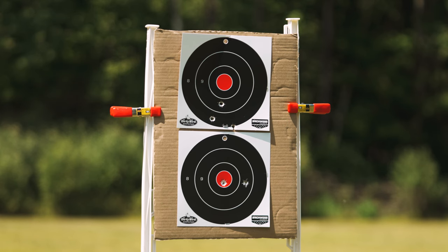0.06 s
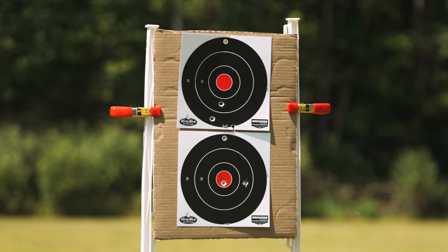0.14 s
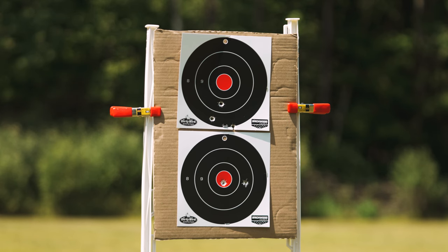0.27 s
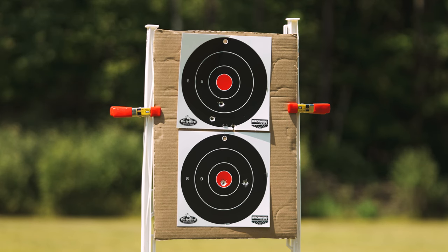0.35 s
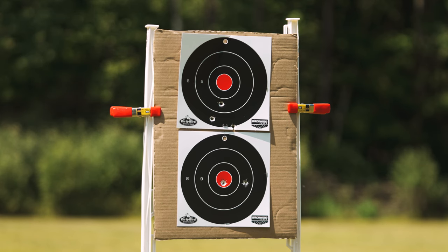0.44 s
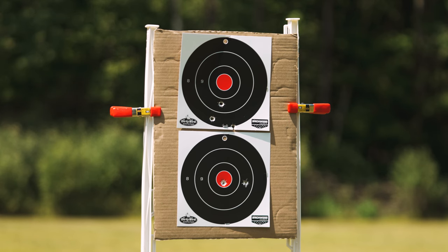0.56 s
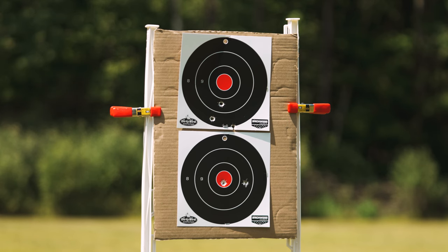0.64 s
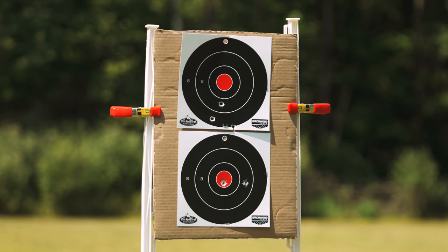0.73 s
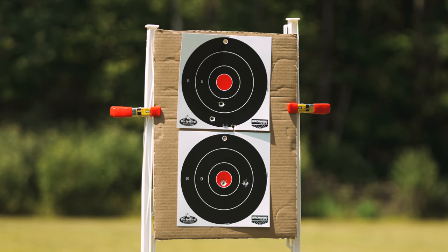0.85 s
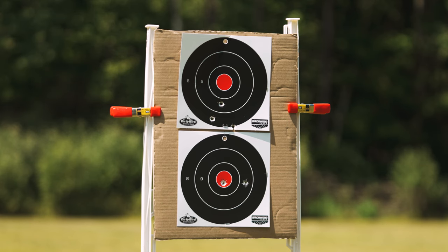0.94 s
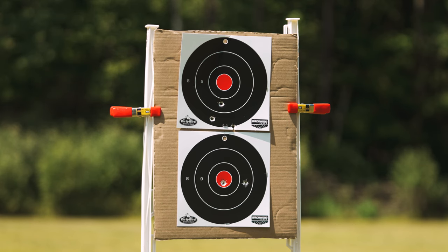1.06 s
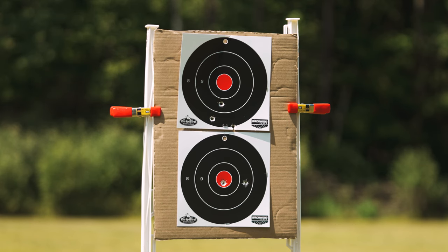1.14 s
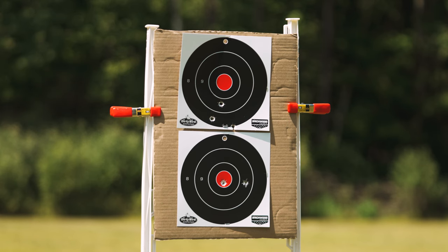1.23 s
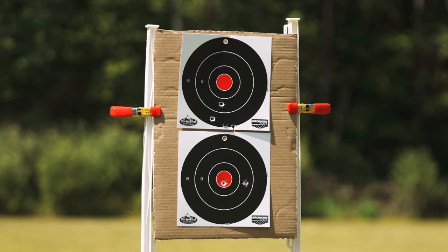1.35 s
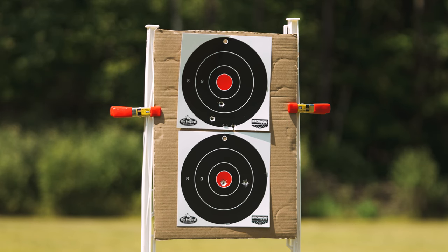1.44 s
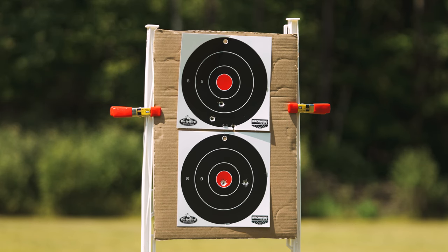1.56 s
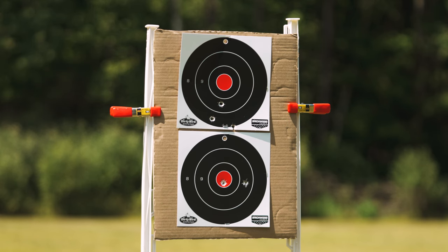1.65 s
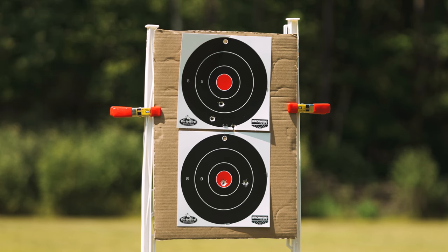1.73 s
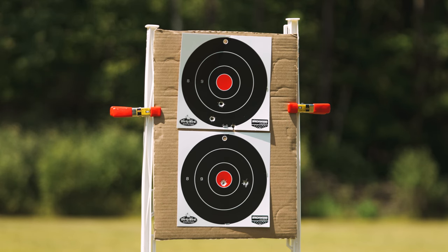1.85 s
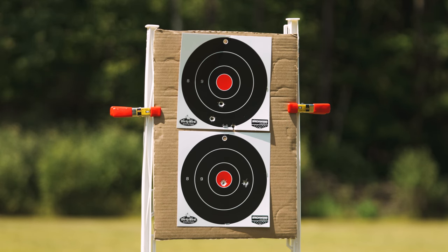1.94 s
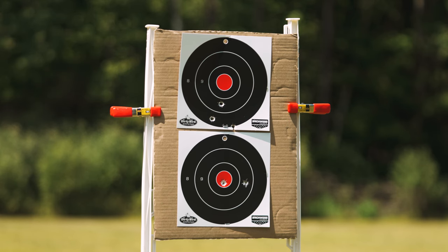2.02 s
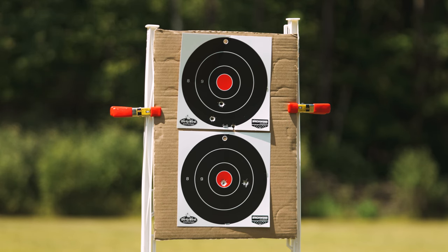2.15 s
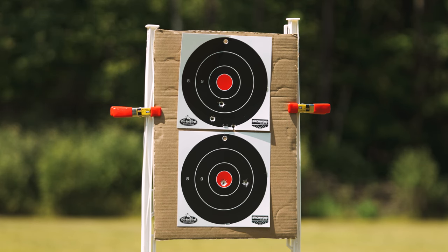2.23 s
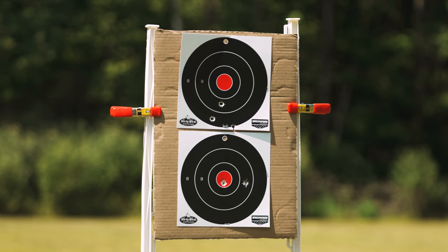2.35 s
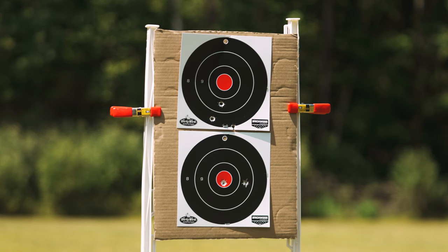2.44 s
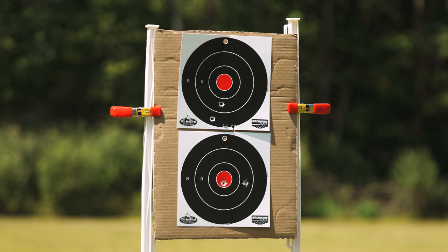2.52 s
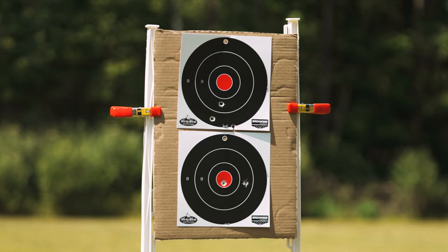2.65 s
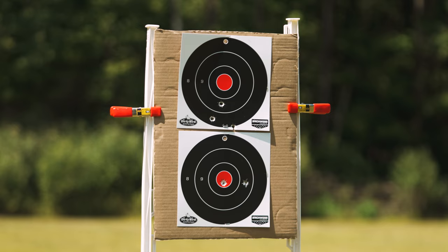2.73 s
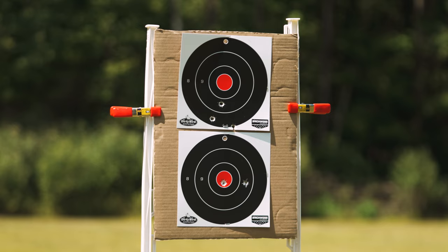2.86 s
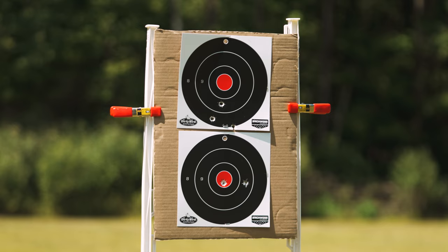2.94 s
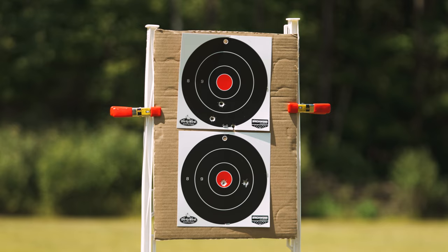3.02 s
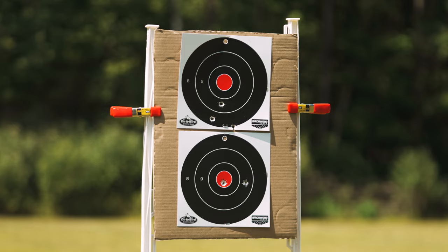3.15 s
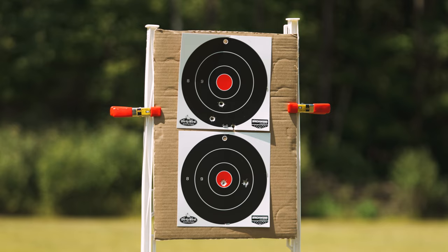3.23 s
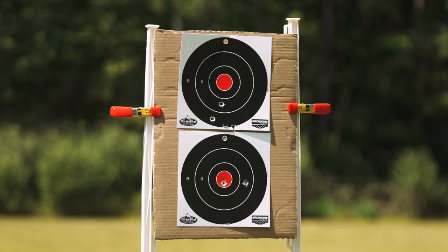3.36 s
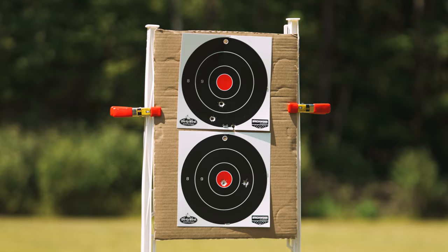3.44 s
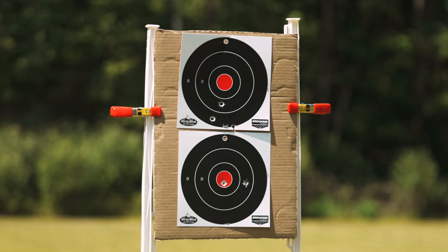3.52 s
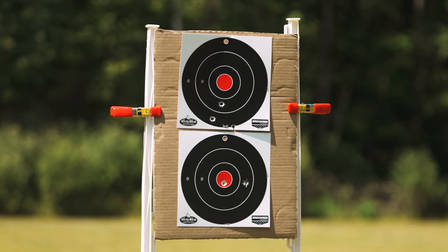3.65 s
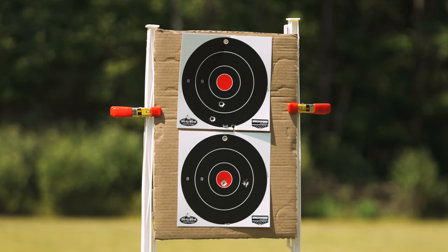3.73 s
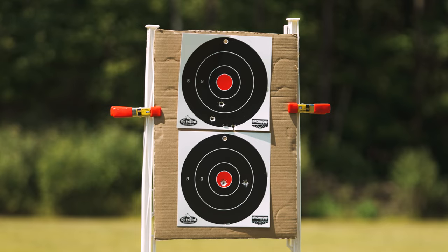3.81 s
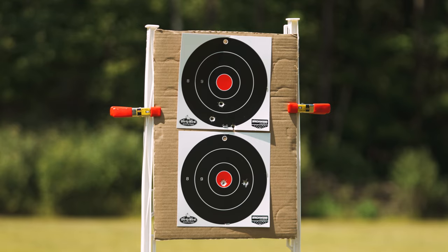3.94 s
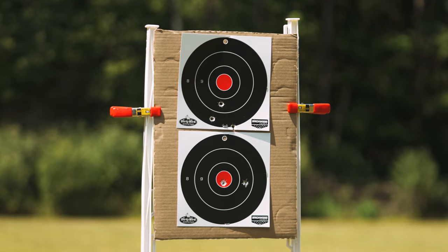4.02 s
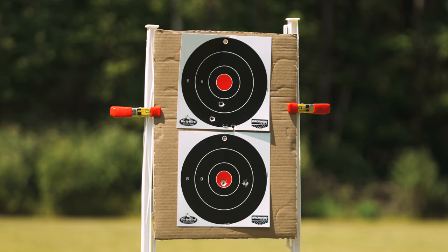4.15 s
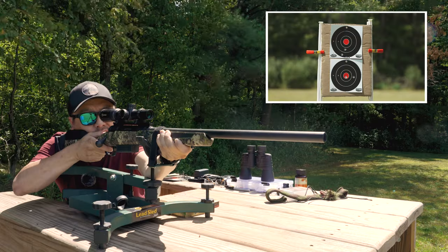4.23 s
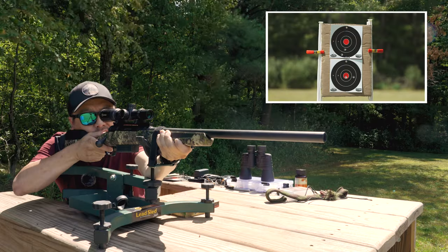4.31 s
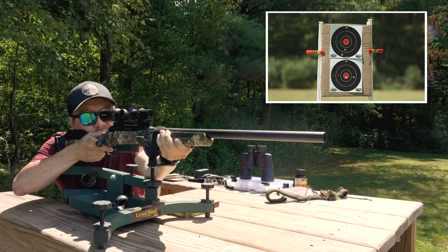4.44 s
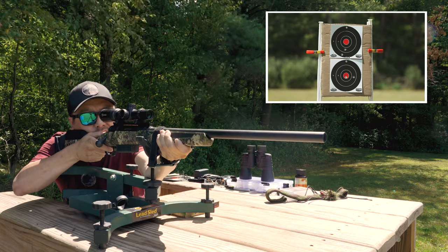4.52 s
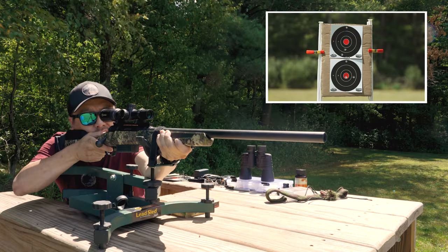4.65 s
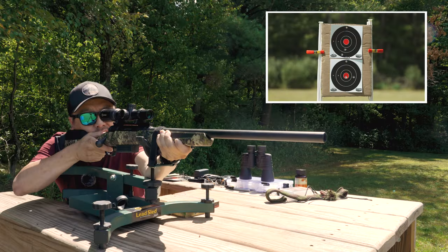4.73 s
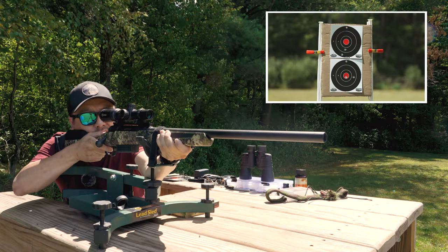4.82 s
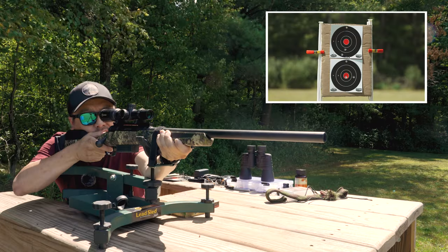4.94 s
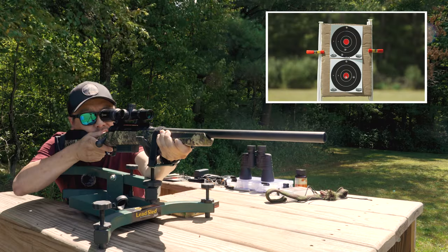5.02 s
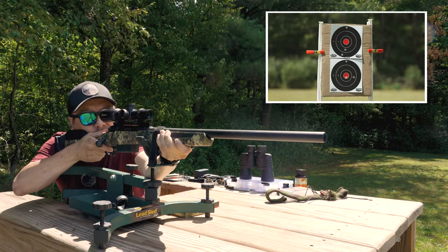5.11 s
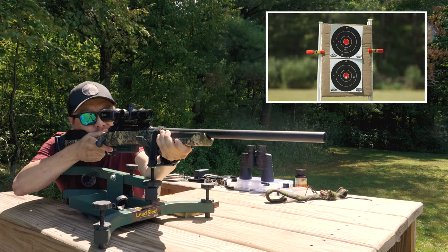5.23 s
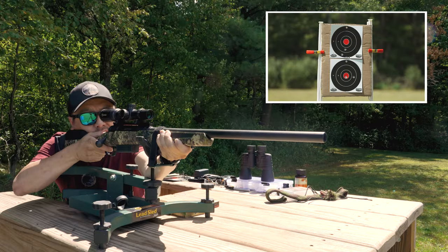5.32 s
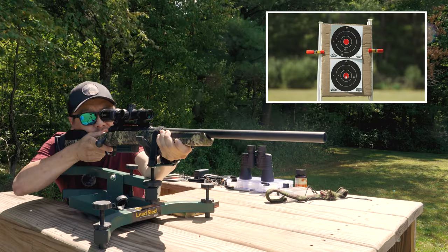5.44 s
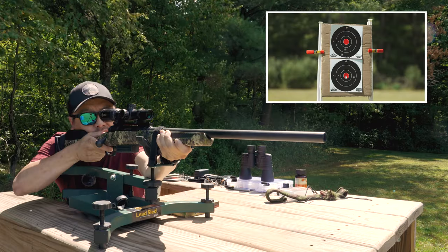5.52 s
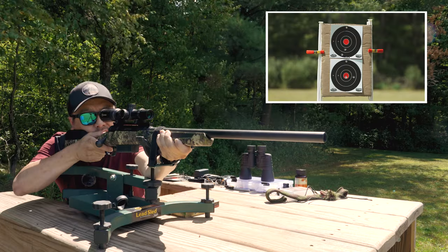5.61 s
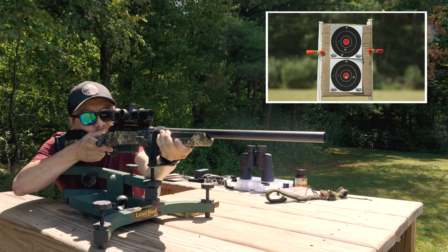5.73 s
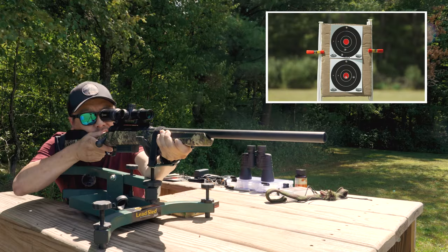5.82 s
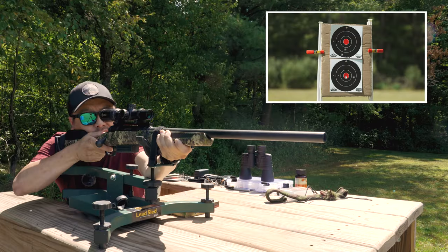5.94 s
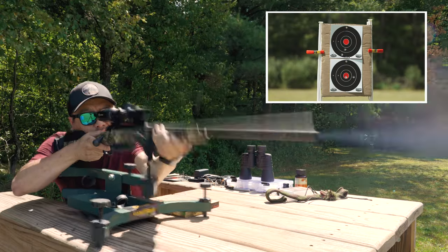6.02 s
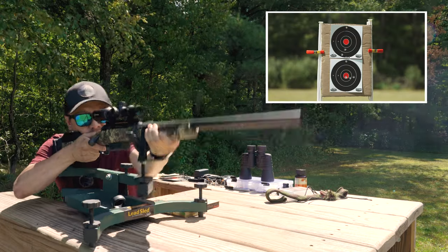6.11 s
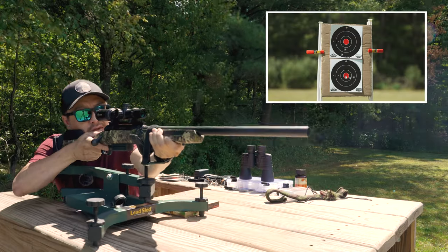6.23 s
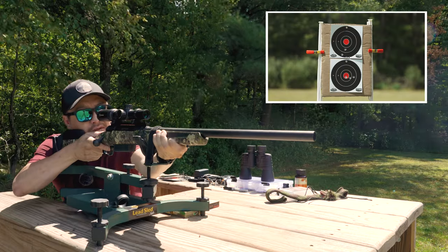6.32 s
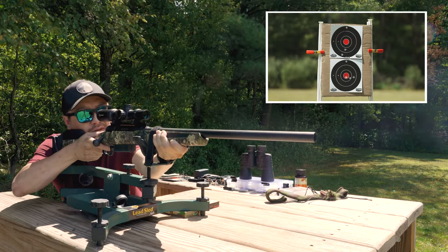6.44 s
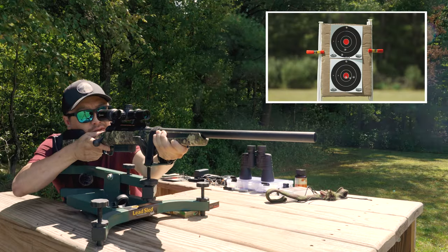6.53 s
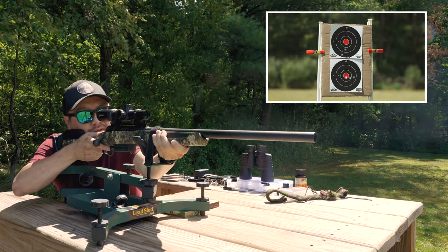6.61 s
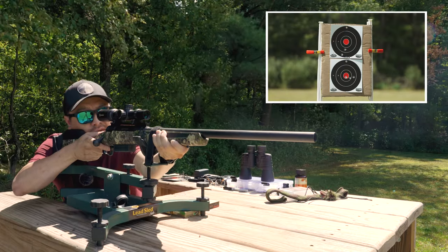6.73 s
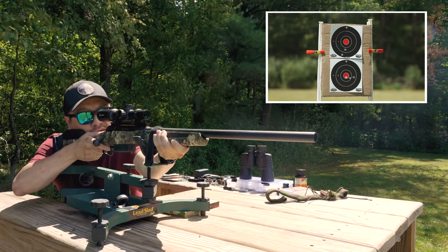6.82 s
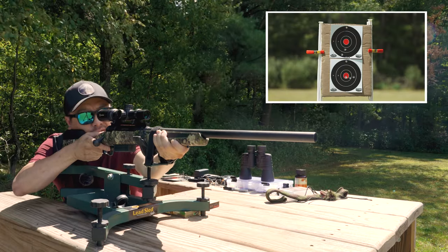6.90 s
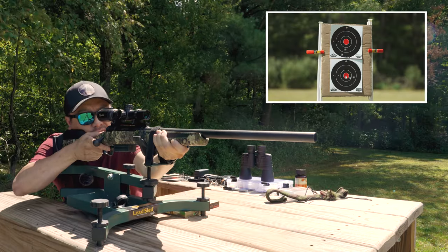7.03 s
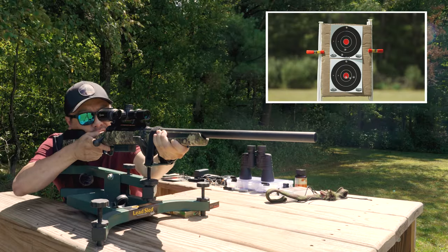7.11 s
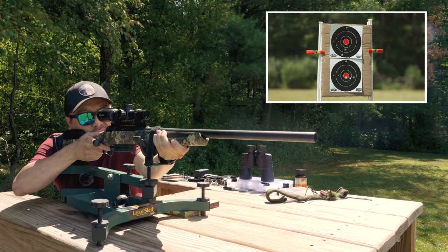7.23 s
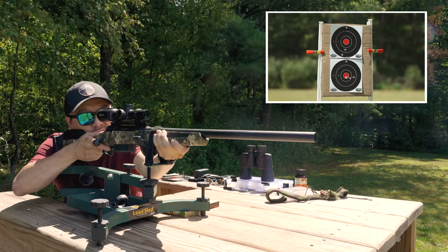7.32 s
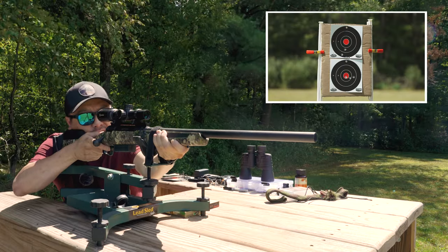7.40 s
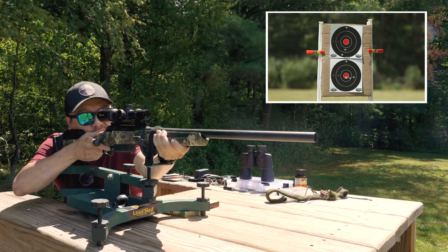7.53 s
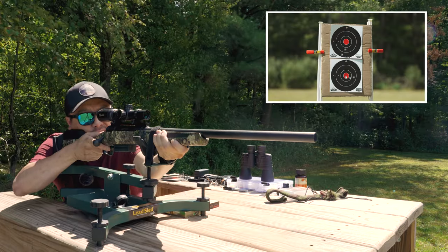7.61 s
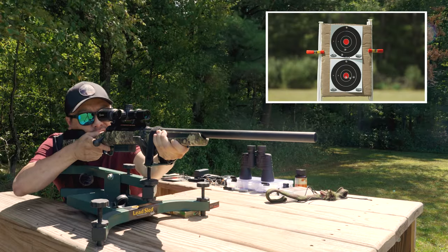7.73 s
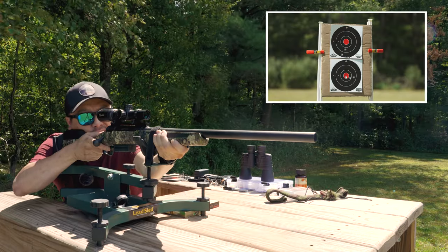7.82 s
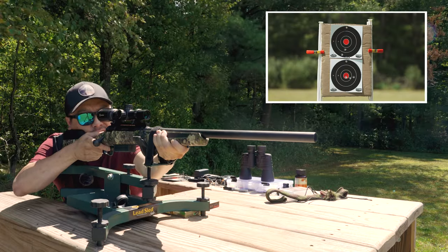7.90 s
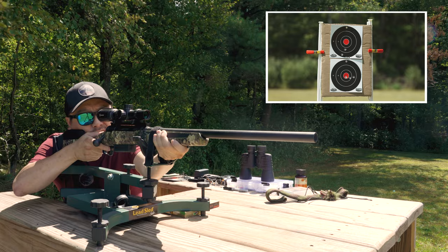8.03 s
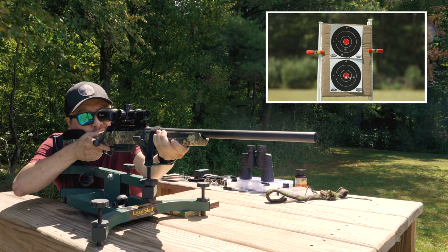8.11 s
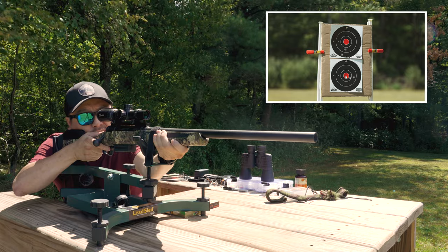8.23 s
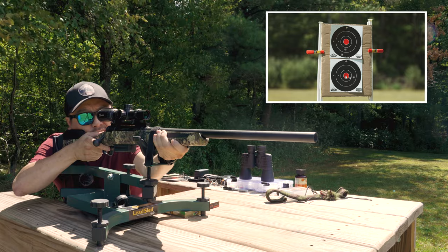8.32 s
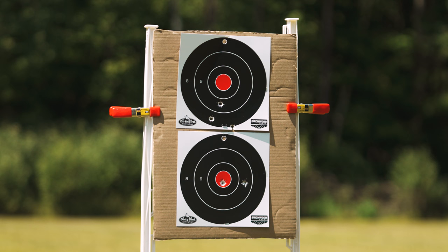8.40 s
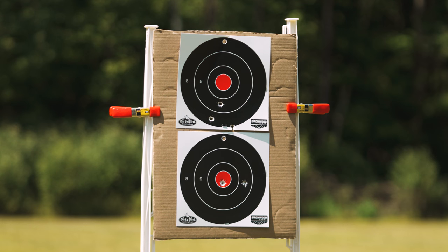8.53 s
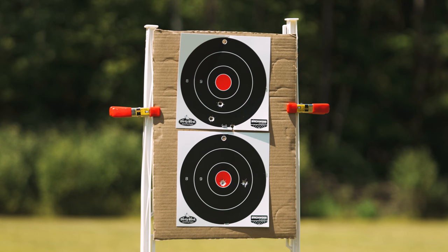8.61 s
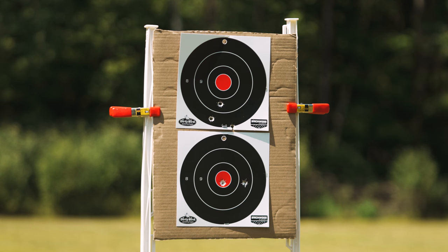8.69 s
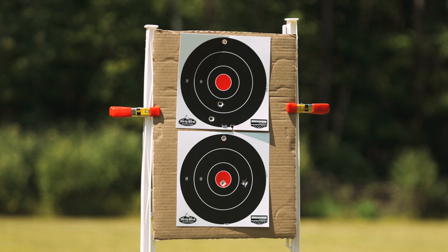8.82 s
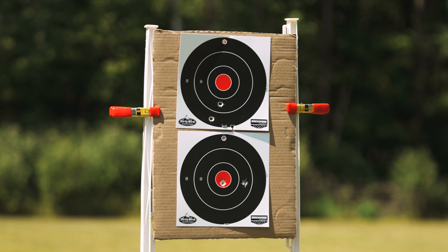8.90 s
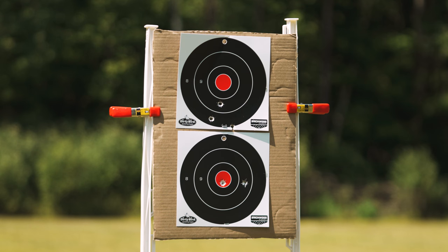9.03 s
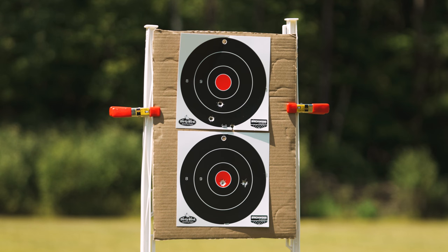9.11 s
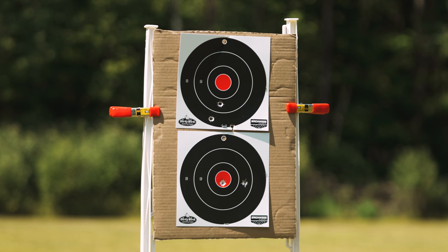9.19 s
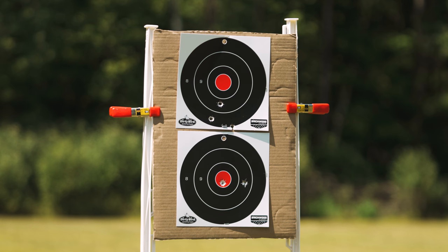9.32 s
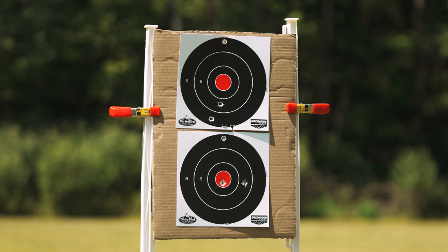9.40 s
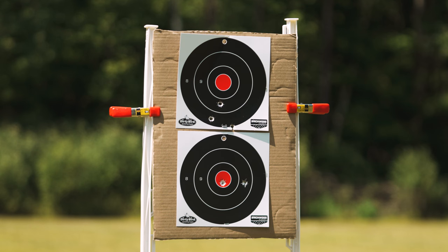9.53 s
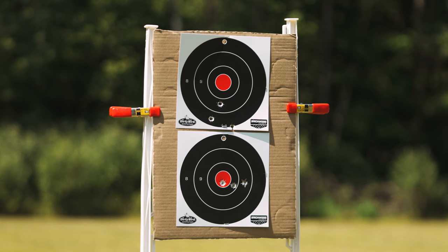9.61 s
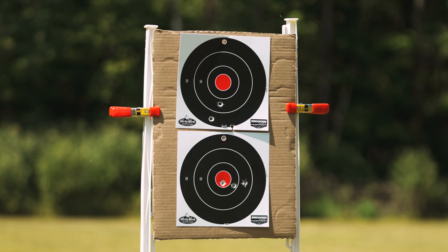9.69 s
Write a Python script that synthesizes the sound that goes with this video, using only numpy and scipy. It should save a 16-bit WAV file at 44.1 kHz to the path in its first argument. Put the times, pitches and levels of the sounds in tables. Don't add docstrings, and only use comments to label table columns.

```python
import sys
import numpy as np
from scipy import signal
from scipy.fft import rfft, irfft
from scipy.io import wavfile
from scipy.ndimage import uniform_filter1d

SR = 44100
rng = np.random.default_rng(int(sys.argv[2]) if len(sys.argv) > 2 else 0)


def store_pcm(level_fs):
    pcm = np.round(np.clip(level_fs, -1, 1) * 32767).astype(np.int16)
    wavfile.write(sys.argv[1], SR, np.atleast_2d(pcm).T)


def linear_from_db(decibels):
    return 10 ** (np.asarray(decibels, float) / 20)


N = 430416
T = np.arange(N) / SR
SHOT_S = 6.12
RAIL, CUT_HZ = 0.46, 171


def curve(rows):
    s, *columns = np.transpose(rows)
    return [np.interp(T, s, c) for c in columns]


def band(x, lo_hz, hi_hz, order=2):
    return signal.sosfilt(signal.butter(order, [lo_hz, min(hi_hz, .45 * SR)], "band", fs=SR, output="sos"), x)


def hiss(lo_hz, hi_hz, size=N):
    x = band(rng.standard_normal(size), lo_hz, hi_hz)
    return x / x.std()


def tinted(peaks):
    white = rng.standard_normal(N)
    x = sum(linear_from_db(db) * band(white, hz - w / 2, hz + w / 2) for hz, w, db in peaks)
    return x / x.std()


def deep(x):
    hz = np.fft.rfftfreq(N, 1 / SR)
    return irfft(rfft(x) * np.sqrt(1 + (CUT_HZ / np.maximum(hz, 40)) ** 6), N)


def ring(x, hz, t60):
    radius = np.exp(-np.log(1000) / (t60 * SR))
    w = 2 * np.pi * hz / SR
    return signal.lfilter([0, np.sin(w)], [1, -2 * radius * np.cos(w), radius * radius], x)


def walk(rate, size=N):
    k = int(SR / rate)
    return 0.71 * uniform_filter1d(np.repeat(rng.standard_normal(size // k + 1), k), k)[:size]


def add(out, s, x):
    i = int(s * SR)
    out[i:i + len(x)] += x[:N - i]


def fade(t60, rise=0.00074, bend=1.25):
    t = T[:int(.15 * SR)]
    return (1 - np.exp(-t / rise)) * np.exp(-np.log(1000) * (t / max(t60, .002)) ** bend)


def field():
    # f/Hz, density level/dB per Hz
    spectrum = [(15, -44), (25, -19), (53, -9), (82, -7), (185, -7), (285, -8), (545, -5), (607, -7.5),
                (775, -9), (1440, -13.5), (2220, -17.5), (2410, -18), (7310, -19), (8590, -20),
                (16000, -30)]
    # t/s, level/dB
    swell = [
        (0, 3),
        (1.5, 3.5),
        (6.1, 1),
        (6.2, 9.5),
        (8.5, 6),
        (9.76, 5),
    ]
    field_db = -59.5
    hz = np.fft.rfftfreq(N, 1 / SR) + 1
    spectrum_hz, spectrum_db = np.transpose(spectrum)
    db = np.interp(np.log(hz), np.log(spectrum_hz), spectrum_db)
    x = irfft(rfft(rng.standard_normal(N)) * linear_from_db(db), N)
    return deep(x / x.std()) * linear_from_db(field_db + curve(swell)[0] + 0.89 * walk(3.52))


def shell():
    # t/s, peak level/dB, mouth ring over it/dB, rim tick over it/dB
    bounces = [(0.0004, -4.5, -28, -14), (0.0143, -15, -14, -12), (0.2914, -11, -6.5, -22),
               (0.343, -34, -6, -14), (0.4463, -14, -10, -7), (0.523, -20.5, -7.5, -12),
               (0.5656, -32, -1, -4), (0.633, -40, -3, -11.5), (0.654, -31.5, -11, -2),
               (0.7724, -50, 4, -17), (0.8585, -36.5, -9, 5.5), (0.868, -52, -3, 6), (0.882, -52, -1, 4),
               (0.8994, -50, 1, -9), (0.9228, -51, -10, 0), (0.972, -41.5, -0.5, 1), (0.977, -50, -5, 7),
               (0.987, -43.5, -20, -2), (1.0413, -45.5, 3.5, 4), (1.0877, -46, -8, 2),
               (1.0995, -42, -15, -15), (1.124, -54, -8, 5), (0.0535, -34, -14, -12)]
    # f/Hz, level/dB, T60/s
    hull_modes = [(376, -5.5, 0.11), (1720, -8, 0.0064), (4200, -19, 0.013), (3590, -16, 0.047),
                  (5190, -6, 0.0084), (7480, -9.5, 0.0065), (8350, -9, 0.0052)]
    # f/Hz, T60/s
    mouth_mode = (1340, .055)
    # f/Hz, T60/s
    rim_mode = (5550, .012)
    # f/Hz, level/dB, T60/s
    rim_overtones = [(6100, -5.5, 0.0095), (6850, -10, 0.007), (8900, -21, .01)]
    # f/Hz, T60/s
    wall_mode = (3480, .12)
    wall_level_db, wall_with_mouth, wall_fade_db_per_s = -10, 1, -3
    shiver_db, shiver_s = -30.5, 0.13
    crack, mouth, rim, wall = np.zeros((4, N))
    for s, db, mouth_db, rim_db in bounces:
        add(crack, s, linear_from_db(db) * (fade(0.0097) + linear_from_db(shiver_db) * fade(shiver_s, bend=1.0)))
        add(mouth, s, linear_from_db(db + mouth_db) * np.ones(1))
        add(rim, s, linear_from_db(db + rim_db) * np.ones(1))
        wall_db = db + wall_level_db + wall_with_mouth * mouth_db + wall_fade_db_per_s * s
        add(wall, s, linear_from_db(wall_db) * np.ones(1))
    crack = crack * hiss(2130, 9000)
    hull = sum(linear_from_db(db - 22.0) * ring(crack + 0.26 * mouth, hz, t60) for hz, db, t60 in hull_modes)
    mouth_hz, mouth_t60 = mouth_mode
    pair = ring(mouth, mouth_hz, mouth_t60) - .8 * ring(mouth, mouth_hz * 1.075, .4 * mouth_t60)
    wall_hz, wall_t60 = wall_mode
    side = .25 * ring(wall, wall_hz, wall_t60) + ring(wall, wall_hz * 1.045, .3 * wall_t60)
    brass = ring(rim, *rim_mode) + sum(linear_from_db(db) * ring(rim, hz, t60) for hz, db, t60 in rim_overtones)
    return linear_from_db(-8.0) * crack + hull + linear_from_db(-4.5) * pair + linear_from_db(-5.5) * side + linear_from_db(-1.5) * brass


def stopped():
    # t/s, level/dB, f/Hz, length/s
    stopped_rings = [(1.2903, -11, 690, .0095), (1.2903, -17, 1055, .004), (1.299, -24, 1050, .007),
                     (1.2815, -22, 810, 0.0063), (1.2815, -29, 1040, .005), (1.312, -27, 2320, .004),
                     (1.3255, -19, 690, 0.0046), (1.3415, -25, 3330, .005), (1.3415, -29, 3000, .004),
                     (1.361, -21, 3300, .004), (1.3625, -25, 4050, 0.0027), (1.358, -28, 2350, .004),
                     (1.368, -20, 3470, 0.0032), (1.3685, -24, 2760, 0.0045), (1.3695, -25.5, 780, .005),
                     (1.36, -28.5, 970, 0.0055), (.0055, -26, 1340, 0.013), (.0006, -15, 3470, .003),
                     (.0006, -15, 7300, .002), (.0006, -20, 9300, .002), (.061, -45, 3450, .01),
                     (.087, -49, 3460, .016), (.059, -52, 7100, .006), (1.8405, -11, 2930, .003),
                     (6.1238, -12, 6500, .0015), (8.541, -30, 2500, .006), (8.539, -33, 4200, .005),
                     (8.538, -30, 6600, .004), (.037, -42, 1340, 0.009), (3.45, -49, 1150, .01),
                     (3.45, -57, 1550, .01), (3.682, -55, 1470, .008), (4, -52, 550, .02),
                     (3.725, -53, 1480, .008), (3.557, -57, 450, .02), (3.791, -42, 2020, 0.0077),
                     (3.791, -42, 2550, .006)]
    out = np.zeros(N)
    for s, db, hz, length in stopped_rings:
        t = T[:int(2 * length * SR)]
        envelope = linear_from_db(db - 9 * (t / length) ** 3) * np.minimum(2 * t * hz, 1)
        add(out, s, envelope * np.sin(2 * np.pi * hz * t))
    return out


def action():
    # t/s, steel peak level/dB, body over it/dB, bright edge over it/dB
    opening = [(1.1618, -20.5, -1, 3.5), (1.168, -41, -1, -5), (1.173, -24.5, -6, -3),
               (1.1805, -32, 0.5, 0), (1.196, -46, -7, -7), (1.2577, -40, 9, -6), (1.2652, -32, 0, 9.5),
               (1.268, -38, 1, 3), (1.2712, -29, 2, 4), (1.282, -28.5, 9, 4), (1.285, -32.5, 8, 1),
               (1.2903, -20, -12, -4), (1.2941, -11.5, -17, 5.5), (1.2995, -28, -6, 6),
               (1.3095, -26, -21, -1), (1.319, -15.5, -24, 1), (1.3258, -15, -13, -4),
               (1.3375, -30, -16, 7), (1.3418, -20, -19, 9.5), (1.354, -20, -6, -8), (1.357, -23, -8, 0),
               (1.3592, -24, -8, 6), (1.3615, -20, -2, 8), (1.3632, -25, -3, -1), (1.3681, -16, -3, 11)]
    # t/s, steel peak level/dB, body over it/dB, bright edge over it/dB
    closing = [(1.752, -20.5, -12.5, 8.5), (1.756, -8, -10.5, -3), (1.7675, -22, 3, 2),
               (1.7736, -45, 17, -4), (1.787, -31, -11, -7), (1.7945, -37, -3, 5), (1.8235, -46, 11, -11),
               (1.832, -29, -5, -9), (1.835, -25, -1, -9), (1.8395, -5, -10, 3), (1.851, -41, 7, -8),
               (1.859, -41, 2, -6), (1.868, -44, 12, -5), (1.879, -45, 9, -5), (9.7095, -41, -1, -9),
               (9.7268, -15.5, -34, -2), (9.7335, -28, 5, -11), (9.741, -17, -12, -1),
               (9.7438, -9, -0.5, -1.5), (9.747, -18, 2, -7), (9.7495, -31, 9, -11)]
    # t/s, steel peak level/dB, body over it/dB, bright edge over it/dB
    stock = [(2.106, -47, -6, -5), (2.54, -51, -8, -6), (2.747, -43, -6, -15), (3.677, -51.5, 9, -10),
             (3.814, -32, -1.5, -14), (3.821, -41, 6, -15), (3.829, -47, -8, -7), (3.891, -57, -10, 8),
             (3.996, -48.5, 0, 2), (4.18, -51, 0.5, -4), (8.5376, -15.5, -8, 3), (8.547, -24, -5, -10),
             (8.553, -33, 4, -14)]
    # t/s, steel peak level/dB, body over it/dB, bright edge over it/dB
    latch = [
        (3.449, -56, 11, -9),
        (3.453, -51, 10, -9),
        (3.682, -55, 8, -9),
        (3.727, -52, 3, -2),
        (3.789, -32, 1, 0),
        (3.793, -26, -5, -16),
        (8.5315, -26, -9, -5),
        (8.533, -25, 2, -14),
        (8.543, -17.5, -9, -7),
        (8.849, -30, -2, 1),
    ]
    # t/s, steel peak level/dB, body over it/dB, bright edge over it/dB
    fingers = [(2.8988, -37, -22, -20), (3.556, -48, -10, -12), (3.66, -56, -8, 5), (3.757, -58, -10, 7),
               (3.893, -51, -15, 1), (9.039, -38.5, -10, -5), (3.8026, -45, -3, -15),
               (3.884, -45, -16, 6.5), (9.034, -38, -12, 0), (9.109, -37, -10, -7), (9.176, -45, 1, -1),
               (9.1845, -44, -15, -8), (9.2, -32, -12, 3.5), (9.209, -34, -12, 3), (9.2177, -36.5, -7, -6),
               (9.223, -34.5, -3, 4.5), (9.31, -41, -10, -9), (9.346, -35, -5, 1), (9.3894, -58, -1, -5),
               (9.4494, -53, 0, -7), (9.619, -46.5, 14, -15)]
    # contacts, body f/Hz, T60/s of a middling blow
    parts = [(opening, 693, 0.017), (closing, 614, 0.016), (stock, 405, 0.02), (latch, 1190, 0.012),
             (fingers, 578, 0.015)]
    # t/s, level/dB, f/Hz, T60/s
    lone_rings = [(0.004, -30, 3475, 0.05), (.004, -36, 7200, 0.039), (.0008, -40, 7340, .08),
                  (.014, -38, 7150, .05), (.0145, -27, 3461, .04), (.6538, -44, 5450, .05),
                  (.5656, -44, 5450, .04), (.4464, -36, 5300, .06), (.002, -44, 5260, .14),
                  (.002, -44, 8950, .09), (.015, -31, 5350, .05), (.015, -31, 9300, .03),
                  (.2918, -34, 1670, .03), (.343, -44, 1600, .03), (3.46, -49.5, 395, .15),
                  (1.325, -19.5, 2320, .02), (1.294, -16, 2390, 0.023), (1.37, -37.5, 540, 0.19),
                  (1.756, -27.5, 655, .02), (1.843, -30, 1300, .04), (1.84, -24, 2200, 0.02),
                  (1.293, -19, 2170, .02), (1.843, -30, 3300, .03), (1.866, -41, 2850, .04),
                  (1.848, -40, 236, .3), (1.845, -42, 399, .2), (1.845, -40, 1165, .1),
                  (1.845, -48, 635, .3), (1.846, -48, 2256, .2), (1.846, -47, 2070, .15),
                  (8.54, -46, 2110, 0.12), (8.545, -35, 1278, 0.14), (1.196, -52, 2904, 0.072),
                  (1.385, -41, 2915, 0.3), (1.842, -41.5, 531, 0.39), (1.843, -52, 1196, 0.61),
                  (1.845, -41, 212, 0.28), (2.106, -52.5, 2070, .03), (2.745, -45, 2060, 0.032),
                  (2.899, -37.5, 2100, 0.015), (3.792, -52, 2890, 0.17), (3.816, -46, 2890, 0.22),
                  (8.548, -37, 2900, 0.2), (8.55, -62, 2730, 0.88)]
    # start t/s,
    # length/s, level/dB, bright over it/dB, change start to end/dB
    slides = [(.006, .1, -50, -2, -16), (1.145, .045, -49, -10, -16), (1.243, 0.076, -52, -8, 11),
              (1.323, 0.094, -36.5, -11, -19), (1.76, .075, -66, -6, -12), (1.856, 0.11, -67, 14, -22),
              (2.346, 0.16, -70.5, 1, 4.5), (2.52, 0.16, -62, -3, -8), (3.785, 0.1, -59, -5, -7),
              (8.565, 0.13, -63, -11, 9.5), (8.692, 0.144, -54, -14, -3), (8.84, .06, -65, -6, -12),
              (9.17, 0.11, -59, -0.5, -3), (9.338, 0.021, -58, 1, -3), (9.627, 0.08, -71, 6, -3)]
    # f/Hz, level/dB, T60/s
    steel_modes = [(531, -18, 0.13), (1290, -21.5, 0.13), (2110, -29, 0.16), (2800, -16.5, 0.02),
                   (4340, -35, .05), (7020, -20, 0.049)]
    # f/Hz, width/Hz, level/dB
    clack_peaks = [(2100, 375, 8), (2790, 710, 5.5), (4050, 1030, 2.5), (5280, 720, 2)]
    # f/Hz, width/Hz, level/dB
    edge_peaks = [(7200, 2200, 0.14), (7930, 2900, -1.02)]
    # f/Hz, width/Hz, level/dB
    spark_peaks = [(11500, 3100, -0.5), (13400, 2700, 1.5)]
    # f/Hz, width/Hz, level/dB
    squeal_peak = (2670, 290, -6.5)
    body_spread, middling_db, harder_is_shorter = 0.073, -25, 0.05
    tick_db, tick_share = -2.5, 0.22
    cloth_db, parts_db, slide_start_s = -3, -2, .012

    steel, edge, spark, rattle, knock, rung, squeal, cloth = np.zeros((8, N))
    hits = [(*hit, hz, t60) for contacts, hz, t60 in parts for hit in contacts]
    for (s, db, body_db, edge_db, hz, t60), chance in zip(hits, rng.standard_normal(len(hits))):
        hz = hz * (1 + body_spread * chance)
        t60 = t60 * linear_from_db(harder_is_shorter * (middling_db - db))
        tick = linear_from_db(tick_db) * fade(tick_share * t60, rise=0.00019)
        add(steel, s, linear_from_db(db - 7) * (fade(t60) + tick))
        add(edge, s, linear_from_db(db + 0.87 * edge_db - 10) * (fade(0.85 * t60) + tick))
        add(spark, s, linear_from_db(db + 2.0 * edge_db - 15.5) * (fade(0.73 * t60) + tick))
        add(rattle, s, linear_from_db(db + body_db - 12.0) * fade(1.52 * t60))
        swing = fade(2.0 * t60, rise=.0006)
        add(knock, s, linear_from_db(db + body_db - 6.5) * swing * np.sin(2 * np.pi * hz * T[:len(swing)]))

    for s, db, hz, t60 in lone_rings:
        t = T[:int(t60 * SR)]
        add(rung, s, linear_from_db(db - 60 * t / t60) * np.sin(2 * np.pi * hz * t))

    grit_db = 2.1 * walk(120)
    for s, length, db, bright_db, change_db in slides:
        on = (T > s) & (T < s + length)
        since = T[on] - s
        rub = linear_from_db(db + change_db * since / length + grit_db[on]) * np.minimum(since / slide_start_s, 1)
        steel[on] += linear_from_db(parts_db) * rub
        cloth[on] += linear_from_db(cloth_db) * rub
        squeal[on] += linear_from_db(squeal_peak[2]) * rub
        rattle[on] += linear_from_db(-15.0) * rub
        edge[on] += linear_from_db(bright_db) * rub
        spark[on] += linear_from_db(bright_db + 1) * rub

    steel = steel * tinted(clack_peaks)
    body = knock + rattle * hiss(494, 1470)
    rings = sum(linear_from_db(db - 30) * ring(steel + body, hz, t60) for hz, db, t60 in steel_modes)
    bright = edge * tinted(edge_peaks) + spark * tinted(spark_peaks)
    rubbing = cloth * hiss(1400, 6400) + squeal * tinted([squeal_peak])
    return steel + bright + body + rings + rung + rubbing


def bench(x, t60=0.36, wet_db=-47, gap=0.0068):
    t = T[:int(.3 * SR)]
    tail = rng.standard_normal(len(t)) * np.exp(-np.log(1000) * t / t60) * (t > gap)
    return x + linear_from_db(wet_db) * band(signal.fftconvolve(x, tail)[:N], 150, 5700, order=1)


def cricket():
    chirp_hz, chirp_db = 4900, -74
    chirp_at_s, chirp_every_s, chirp_share = 4.9, .39, .14
    phase = ((T - chirp_at_s) / chirp_every_s + .5) % 1 - .5
    chirps = np.exp(-(phase / chirp_share) ** 2) * linear_from_db(chirp_db + 3.5 * walk(2.5))
    return chirps * hiss(chirp_hz - 170, chirp_hz + 170)


def rumble():
    # peak t/s, level/dB, brightness/dB, rise/s, fall/s
    thuds = [(1.292, -55, -10, 0.06, 0.063), (1.38, -53.5, 13, 0.046, 0.12), (1.768, -46, -5, .02, 0.05),
             (1.856, -42, 3.5, 0.032, 0.097), (1.942, -57, -18, .05, 0.081), (3.804, -59, 18, 0.025, 0.079),
             (4.02, -56, -8, .05, .04), (4.31, -49, -9, 0.074, 0.086), (4.588, -49, -9, 0.083, 0.054),
             (4.646, -44, -11.5, .04, 0.087), (4.736, -49, -12, 0.088, 0.14),
             (8.546, -46, 17.5, 0.017, 0.047)]
    skirt_db = -22.5
    low, upper = np.zeros((2, N))
    for s, db, upper_db, rise, fall in thuds:
        on = (T > s - rise) & (T < s + fall)
        thud = linear_from_db(db + skirt_db * np.maximum((s - T[on]) / rise, (T[on] - s) / fall))
        low[on] += linear_from_db(-1.5) * thud
        upper[on] += linear_from_db(upper_db - 1.5) * thud
    return deep(linear_from_db(1.2 * walk(60)) * (low * hiss(34, 144) + upper * hiss(156, 500)))


def shot():
    # t/s, level/dB
    blast_levels = [
        (6.1212, -37),
        (6.1225, -17),
        (6.1245, -5),
        (6.128, -8.5),
        (6.14, 1.5),
        (6.153, -1),
        (6.198, -8),
        (6.23, -8.5),
        (6.25, -19),
        (6.28, -27),
    ]
    # t/s, offset/rails
    pressure_swing = [(6.122, 0), (6.136, .2), (6.141, 1.1), (6.152, 1.6), (6.16, 11), (6.196, 11),
                      (6.1976, 2), (6.1979, -1.2), (6.1985, -1), (6.1988, 1.2), (6.1993, 1), (6.1998, -.6),
                      (6.2008, -4.5), (6.229, -10), (6.2325, -1.83), (6.26, 0.5), (6.29, 0)]
    # t/s, level above the low rail/rails
    spikes = [
        (6.1564, 1.8),
        (6.2195, 1.1),
        (6.2255, .15),
    ]
    # t/s, level/dB, upper f/Hz
    slaps = [
        (6.258, 0, 7000),
        (6.359, -1.5, 9500),
        (6.48, -24, 10000),
        (7.012, -42, 11500),
    ]
    treble_level_db, treble_lag = -7.5, 0.3
    first_crack_db, first_crack_s = 5, 0.011
    db = curve(blast_levels)[0]
    first_crack = first_crack_db * np.exp(-np.abs(T - SHOT_S) / first_crack_s)
    treble_db = treble_level_db - treble_lag * db + first_crack
    on = (T > blast_levels[0][0]) & (T < blast_levels[-1][0])
    roar = on * linear_from_db(db) * (hiss(250, 1550) + linear_from_db(treble_db) * hiss(1370, 10000))
    blast = roar + RAIL * curve(pressure_swing)[0]
    for s, rails in spikes:
        i = int(s * SR)
        blast[i:i + 3] = RAIL * (rails - 1)
    for s, slap_db, hz in slaps:
        burst = band(rng.standard_normal(int(.15 * SR)), hz / 3.1, hz * 1.08)
        add(blast, s, linear_from_db(slap_db) * fade(0.0081) * burst)
    return blast


def woods():
    # t/s, level/dB, path through the air/m
    echo_levels = [(6.24, -27, 0), (6.31, -19, 30), (6.57, -21.5, 87), (6.7, -21, 103), (6.8, -21, 126),
                   (6.9, -22.5, 181), (7.0, -23, 251), (7.27, -26, 517), (7.66, -34.5, 726),
                   (8.4, -45, 1001), (9.6, -60, 1201)]
    band_centres = (160, 700, 2800, 8500)
    # f/Hz, level/dB
    echo_colour = [(50, -24), (110, 3.5), (300, -6.5), (450, -0.5), (700, 6), (1000, 2), (1500, 4.5),
                   (2200, 4), (5000, -0.5), (14000, -3)]
    # t/s, level/dB, f/Hz, length/s
    stands = [(6.255, 10.5, 2800, 0.015), (6.4, -3, 2000, 0.11), (6.287, 4.5, 770, .006),
              (5.6, 3, 900, 0.0085), (6.385, 4, 1600, 0.0071), (6.577, 4, 1400, .006),
              (6.833, 4, 1900, .006), (6.73, 5.5, 620, .006), (6.66, -4, 380, 0.035), (6.41, -4, 750, .05),
              (6.5, 2, 4500, .3), (6.298, 2, 550, .03), (6.455, 5.5, 730, 0.021), (6.512, 7, 650, 0.012),
              (6.567, 4, 680, 0.027), (6.605, 5.5, 9000, 0.0063), (6.628, 3, 2800, 0.02),
              (6.853, 1.5, 2400, 0.07), (6.553, 2.5, 1700, 0.054), (6.676, 4.5, 2100, 0.0061),
              (6.628, 4.5, 2400, 0.011), (6.498, 1.5, 1500, .02), (6.723, 1, 1600, .012),
              (6.771, 1, 1400, .012), (6.43, 3, 2700, .03), (6.657, 4, 11500, 0.083),
              (6.74, 2.5, 2400, 0.09), (6.79, 2.5, 570, 0.025), (6.917, 2, 700, 0.012),
              (7.033, 2.5, 500, 0.016), (7.11, 2, 620, 0.02)]
    stand_octaves = 0.99
    trunk_db, trunk_s = 1.6, .0004
    air_db_per_km, air_power = 5.5, 1.562
    bass_start_db, boom_db, boom_s, bass_lingers_db_per_s = -18.5, 25, 0.34, 4
    middle_db, treble_db = -2, 1

    late = T > 6.2
    size = late.sum()
    fine = np.fft.rfftfreq(size, 1 / SR) + 20
    colour_hz, colour_level = np.transpose(echo_colour)
    colour_db = np.interp(np.log(fine), np.log(colour_hz), colour_level)
    hold = int(trunk_s * SR)
    trunk_levels = np.repeat(rng.exponential(size=size // hold + 1), hold)[:size]
    trunks = rng.standard_normal(size) * linear_from_db(trunk_db * trunk_levels)
    noise = irfft(rfft(trunks / trunks.std()) * linear_from_db(colour_db) * np.sqrt(SR / fine / .56), size)

    hz, t, cells = signal.stft(noise, SR, nperseg=384, noverlap=320)
    at = np.minimum((t * SR).astype(int), size - 1)
    hz = hz[:, None] + 20
    db, path_m = (c[late] for c in curve(echo_levels))
    now = T[late][at]
    since = now - SHOT_S
    bass_db = bass_start_db + boom_db * np.exp(-since / boom_s) + bass_lingers_db_per_s * since
    bass, _, middle, treble = (np.interp(np.log(hz), np.log(band_centres), row) for row in np.eye(4))
    air_db = air_db_per_km * (hz / 1000) ** air_power * path_m[at] / 1000
    stand_db = sum(lift_db * np.exp(-(np.log2(hz / at_hz) / stand_octaves) ** 2 - ((now - s) / length) ** 2)
                   for s, lift_db, at_hz, length in stands)

    half_octave = (2 * np.log2(hz[:, 0] / 20)).astype(int) % 20
    own = np.array([walk(14.14, size=size)[at] for _ in range(20)])[half_octave]
    whole_stands = 1.1 * walk(24.56, size=size)[at]
    single_trunks = 1.33 * walk(110, size=size)[at] * (hz > 900)
    flutter_db = whole_stands + single_trunks + 1.77 * own
    gain_db = bass * bass_db + middle * middle_db + treble * treble_db - air_db + stand_db + flutter_db
    echo = signal.istft(cells * linear_from_db(gain_db), SR, nperseg=384, noverlap=320)[1][:size]
    out = np.zeros(N)
    out[late] = np.clip((T[late] - 6.235) / 0.011, 0, 1) * linear_from_db(db - 6.5) * echo
    return out


def scene():
    handling = bench(shell() + action()) + stopped() + rumble()
    return (handling + shot() + woods() + field() + cricket())[None]


def band_limit(x):
    return signal.sosfilt(signal.butter(12, 16970, fs=SR, output="sos"), x)


def record(dry):
    # t/s, level/dB
    ducking = [
        (6.12, 1.5),
        (6.126, -2.5),
        (6.132, -6),
        (6.16, -10.5),
        (6.2, -3),
        (6.8, -0.5),
        (7, -2),
    ]
    # f/Hz, width/Hz, level/dB
    capsule = (13900, 950, -6)
    # t/s, level/dB, length/s
    thumps = [
        (6.155, -28, .002),
        (6.2032, -23, 0.0026),
        (6.223, -28, .0025),
    ]
    wider_s, wider_rail = 6.4, 2.2
    ceiling = 0.85
    rail = RAIL * np.where(T > wider_s, wider_rail, 1)
    clipped = np.clip(dry, -rail, rail)
    cut = signal.sosfilt(signal.butter(3, CUT_HZ, "high", fs=SR, output="sos"), clipped)
    hz, width, db = capsule
    cut = cut + linear_from_db(db) * band(cut, hz - width / 2, hz + width / 2, order=1)
    held = ceiling * np.tanh(cut * linear_from_db(curve(ducking)[0]) / ceiling)
    for s, db, length in thumps:
        held = held + linear_from_db(db) * (s - T) / length * np.exp(-((T - s) / length) ** 2)
    mix = signal.sosfilt(signal.ellip(8, .2, 60, 15800, fs=SR, output="sos"), held)
    return band_limit(mix)


dry = scene()
out = record(dry)
store_pcm(out)
```